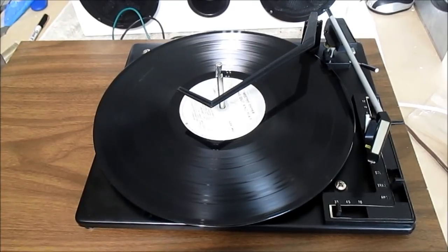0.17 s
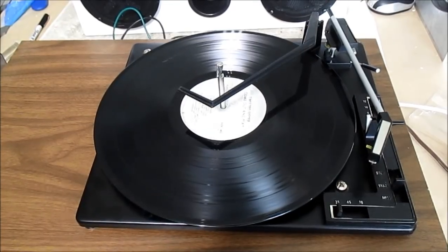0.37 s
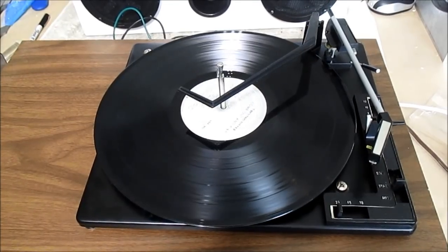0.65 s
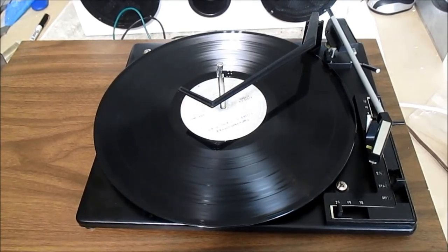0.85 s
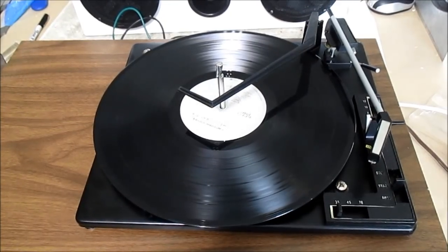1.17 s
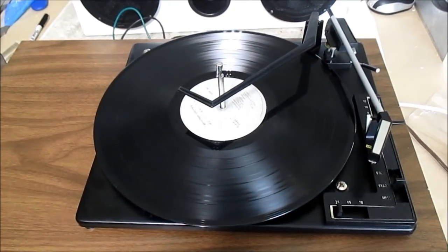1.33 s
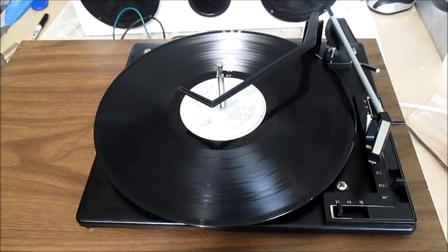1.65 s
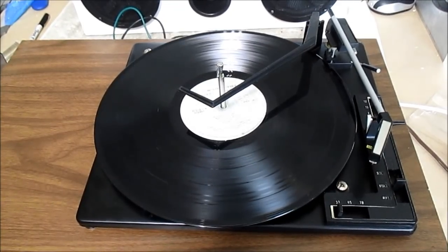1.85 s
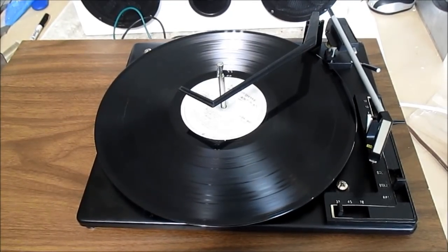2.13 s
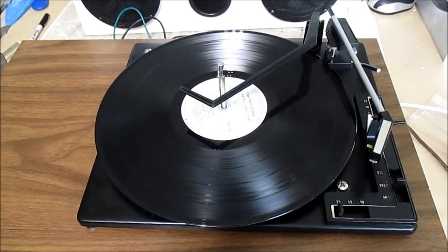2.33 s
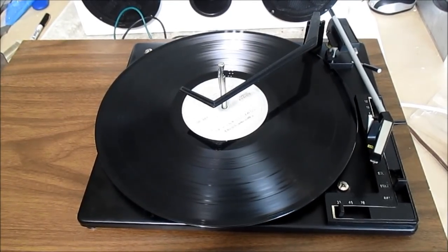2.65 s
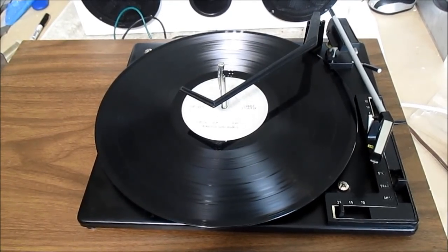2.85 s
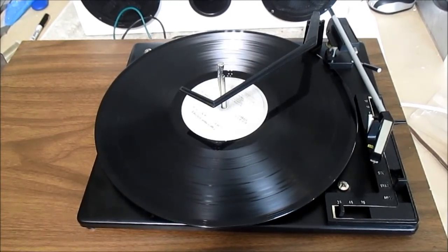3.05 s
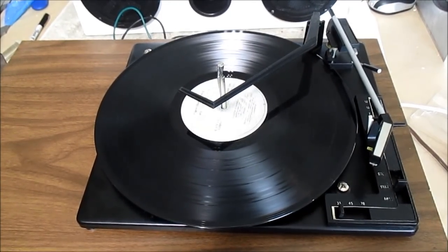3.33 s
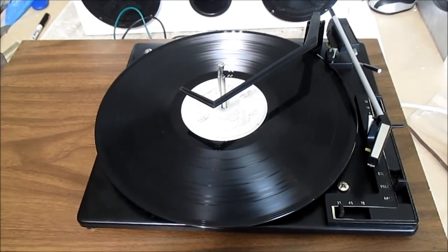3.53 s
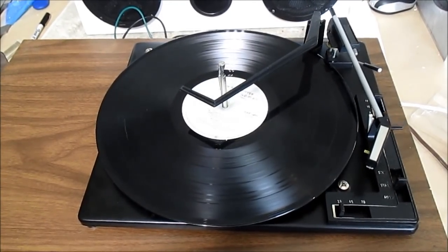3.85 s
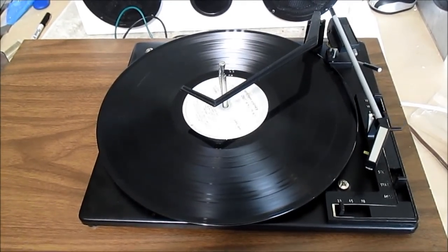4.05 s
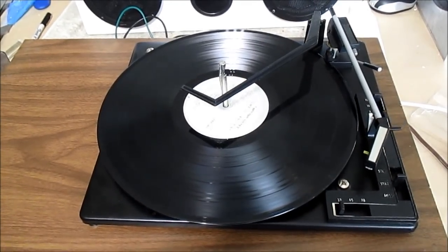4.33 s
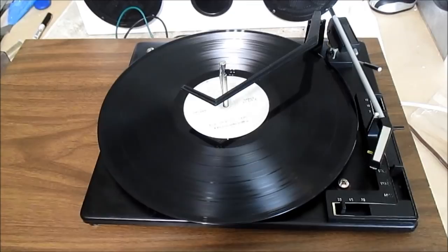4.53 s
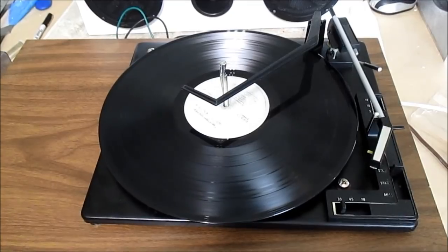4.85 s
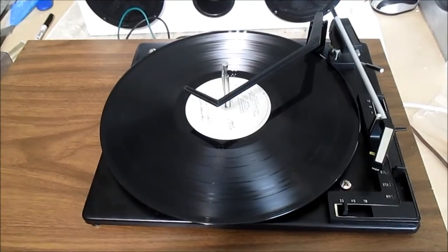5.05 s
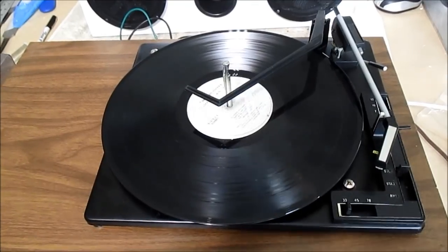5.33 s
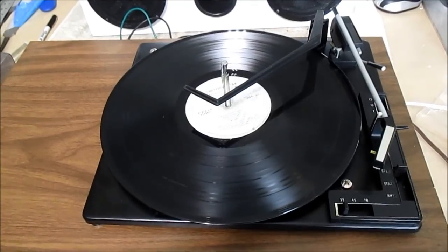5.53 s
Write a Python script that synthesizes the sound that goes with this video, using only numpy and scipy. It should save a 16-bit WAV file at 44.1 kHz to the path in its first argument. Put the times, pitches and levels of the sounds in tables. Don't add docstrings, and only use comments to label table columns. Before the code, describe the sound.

A small turntable motor hums and rumbles while levers tick and knock irregularly, ending in a loud hard clunk, then quieter hum.

```python
import sys
import numpy as np
from scipy import signal
from scipy.fft import rfft, irfft, next_fast_len
from scipy.io import wavfile
from scipy.ndimage import map_coordinates

SR = 44100
rng = np.random.default_rng(int(sys.argv[2]) if len(sys.argv) > 2 else 0)


def dump(signal):
    limited = np.clip(np.atleast_2d(signal).T, -1, 1)
    pcm = np.round(limited * 32767).astype(np.int16)
    wavfile.write(sys.argv[1], SR, pcm)


def invert_db(x):
    u = np.asarray(x, float) / 20
    return 10 ** u


N = 250532
T = np.arange(N) / SR

# [f/Hz, level/dB, t60/s]
PLINTH_MODES = [(136, 3, 0.55), (180, -7.5, 0.72), (223, 3, 0.3), (228.7, 3.5, 0.36), (258, -1.5, .27),
                (336, 0, 0.33), (379.7, 3.5, 0.27), (344, -2, .35), (395, -1, 0.22), (453, -7, 0.31),
                (489, -10, 0.66), (531, -14, 0.17)]


def unit(x):
    return x / np.sqrt(np.mean(x ** 2) + 1e-20)


def along(points, hz):
    f, v = np.transpose(points)
    return np.interp(np.log(hz + 1), np.log(f + 1), v)


def wobble(rate_hz):
    knots = rng.standard_normal(int(N * rate_hz / SR) + 4)
    return map_coordinates(knots, [T * rate_hz])


def noise(gain):
    m = next_fast_len(N + 8192)
    spectrum = rfft(rng.standard_normal(m)) * gain(np.fft.rfftfreq(m, 1 / SR))
    return unit(irfft(spectrum, m)[:N])


def smooth_step(at_s, takes_s):
    return .5 + .5 * np.tanh((T - at_s) / takes_s)


def ring(modes, centre_hz, octaves, t, luck):
    hz, db, t60 = np.transpose(modes)[:, :, None]
    near = np.exp(-.5 * (np.log2(hz / centre_hz) / octaves) ** 2)
    decay = invert_db(db + 1.5 * luck[:, None] - 60 * t / t60)
    x = np.sum(near * decay * np.sin(2 * np.pi * hz * t), axis=0)
    return x / np.abs(x).max()


def add(track, at_s, x):
    track[round(at_s * SR):][:len(x)] += x


def contacts():
    # [t/s, peak/dB, centre f/Hz, spread/octaves, t60/s]
    clunk_clicks = [
        (4.4230, -24, 2000, .8, .03),
        (4.4264, 5, 1650, .7, .015),
        (4.4268, -3, 1000, .25, .016),
        (4.4346, -19, 2200, 1.0, .02),
        (4.4385, -17, 1500, 1.0, .03),
        (4.4418, -8, 3700, .5, .025),
        (4.4452, -14, 2500, 1.0, .02),
        (4.4474, 2, 2000, 1.2, .03),
        (4.4478, 3, 1100, .35, .035),
        (4.474, -28, 4500, .7, .02),
    ]
    # [t/s, peak/dB, centre f/Hz, sparkle/dB, t60/s]
    clacks = [(1.238, -6, 1920, -30.5, .06), (1.2387, -26.5, 4640, -11.5, 0.048),
              (1.908, -28.5, 1150, -36, 0.062), (2.043, -36, 3840, -6.5, 0.024),
              (3.168, -30, 1450, -40, 0.056), (3.354, -14.5, 1880, -45, 0.027),
              (3.44, -30.5, 1220, -26, 0.087), (3.727, -28.5, 2400, -24, 0.071),
              (3.739, -15.5, 1210, -40.5, 0.11), (3.751, -13, 1800, -33, 0.015),
              (3.761, -28, 1570, -33, 0.026), (3.856, -17.5, 1700, -46, 0.058),
              (3.894, -42, 4200, 4, 0.051), (3.965, -35.5, 2900, -33, .033), (4.084, -39, 2700, -25, 0.05),
              (4.181, -24, 1100, -43.5, 0.034), (4.405, -18, 1740, -27.5, 0.065)]
    # [t/s, peak/dB, centre f/Hz]
    pawl_ticks = [(1.173, -49, 1530), (1.626, -49, 1400), (1.842, -54, 1790), (2.912, -42, 1300),
                  (2.927, -42.5, 1700), (3.29, -51, 1390), (3.413, -44, 1600), (3.435, -40.5, 3780),
                  (3.560, -40, 1830), (3.611, -48, 2000), (3.795, -40, 2300), (3.88, -36, 3670),
                  (4.339, -46, 2610), (4.39, -47, 2950), (5.551, -43.5, 2780), (5.575, -45.5, 990),
                  (5.62, -49, 1290), (5.649, -44, 1080)]
    rows = list(clacks)
    for s, db, hz in pawl_ticks:
        sparkle_db = -34.5 + 25 * (hz / 4200) ** 2
        t60_s = 0.12 * 1700 / hz
        rows.append((s, db, hz, sparkle_db, t60_s))
    cycle = [(s, db, hz, 0.79 + .006 * db, *rest) for s, db, hz, *rest in rows]
    return cycle + [(s, db, hz, octaves, -12.5, t60) for s, db, hz, octaves, t60 in clunk_clicks]


def clicks():
    # [f/Hz, level/dB, t60/s]
    steel_modes = [(885, -7.5, 0.1), (1017, -5, 0.24), (1290, -4, 0.81), (1400, 3.5, 0.15),
                   (1625, 6.5, 0.22), (1776, 0, 0.1), (2150, -8.5, 0.12), (2515, 4, 0.06),
                   (2780, 2.5, 0.054), (3190, -3, 0.04), (3800, -7.5, 0.033), (4220, -4.5, 0.12),
                   (4740, 3, 0.12), (5053, -0.5, .06)]
    out, t = np.zeros(N + SR), np.arange(SR // 3) / SR
    high = signal.butter(2, [3700, 10000], "band", fs=SR, output="sos")
    for s, db, hz, octaves, sparkle_db, t60_s in contacts():
        luck = rng.standard_normal(len(steel_modes))
        grit, sparks = rng.standard_normal((2, len(t)))
        fade = invert_db(-60 * t / max(t60_s, .008))
        steel = ring(steel_modes, hz, octaves, t, luck) * (fade + invert_db(-23.5))
        edges_hz = [hz / 2 ** (.7 * octaves), hz * 2 ** octaves]
        band = signal.butter(3, edges_hz, "band", fs=SR, output="sos")
        chatter = invert_db(-25 - 60 * t / .25)
        scrape = invert_db(-13) * unit(signal.sosfilt(band, grit)) * (fade + chatter)
        crack = invert_db(sparkle_db - 60 * t / min(t60_s, .03)) * signal.sosfilt(high, sparks)
        rise = 1 - np.exp(-(t / 0.0007) ** 2)
        add(out, s, invert_db(db) * (steel + scrape + crack) * rise)
    return out[:N]


def knocks():
    # [t/s, peak/dB, f/Hz, swing length/s]
    cycle_knocks = [(.079, -53.5, 335, 0.039), (.714, -56.5, 395, 0.11), (1.079, -48.5, 360, 0.028),
                    (1.2405, -21, 340, 0.026), (1.628, -39, 307, 0.012), (1.907, -47, 236, 0.072),
                    (1.909, -39.5, 421, 0.02), (2.046, -33.5, 247, 0.018), (2.048, -38, 379, 0.037),
                    (3.746, -32, 504, 0.021), (2.899, -55, 360.6, 0.11), (2.931, -36, 380, 0.026),
                    (2.991, -49, 290, 0.046), (3.169, -43, 426, 0.016), (3.266, -46.5, 250, 0.014),
                    (3.338, -43.5, 243, 0.042), (3.446, -36.5, 268, 0.017), (3.531, -51, 443, 0.1),
                    (3.572, -38.5, 372, 0.036), (3.782, -37, 401, 0.043), (4.239, -42.5, 340, 0.035),
                    (3.7411, -21, 351.7, 0.017), (3.863, -46.5, 364, 0.052), (4.183, -25.5, 334, 0.024),
                    (4.409, -26.5, 310, .02), (5.509, -54.5, 242, .029)]
    # [t/s, peak/dB, f/Hz, swing length/s, rise/s]
    clunk_knocks = [
        (4.4272, -8, 380, .005, .0004),
        (4.4378, -17, 250, .013, .001),
        (4.4484, 5, 280, .016, .0002),
        (4.452, -10, 146, .03, .004),
        (4.449, -22, 75, .05, .004),
        (4.4585, -16, 335, .09, .004),
        (4.47, -23, 140, .25, .02),
    ]
    out, t = np.zeros(N + SR), np.arange(SR // 2) / SR
    default_rise_s = 0.00089
    rows = [(*row, default_rise_s) for row in cycle_knocks] + list(clunk_knocks)
    for s, db, hz, length_s, rise_s in rows:
        luck = rng.standard_normal(len(PLINTH_MODES))
        swing = invert_db(-60 * (t / length_s / 1.1) ** 2.6) * np.sin(2 * np.pi * hz * t)
        body = invert_db(-13) * ring(PLINTH_MODES, hz, .6, t, luck)
        rise = 1 - np.exp(-t / max(rise_s, .0002))
        add(out, s, -invert_db(db + 6.0) * (swing + body) * rise)
    return signal.sosfilt(signal.butter(2, 100, "high", fs=SR, output="sos"), out[:N])


def room(x):
    # [f/Hz, t60/s]
    decay_t60 = [(150, 0.34), (500, 0.5), (1500, 0.36), (3500, 0.33), (6000, 0.36), (12000, 0.2)]
    hz, t, z = signal.stft(rng.standard_normal(SR // 2), SR, nperseg=256)
    decay = invert_db(-60 * t / along(decay_t60, hz)[:, None])
    dulling = 1 + (hz[:, None] / 7000) ** 2
    tail = signal.istft(z * decay / dulling, SR, nperseg=256)[1]
    delayed = np.pad(x, (330, 0))
    return signal.fftconvolve(delayed, tail / np.linalg.norm(tail))[:N]


def motor():
    # [t/s, load/dB]
    load_points = [(0, -10.5), (.35, -3), (1.1, -3.5), (1.5, -3), (1.94, 3), (2.2, -0.5), (2.7, -4),
                   (2.9, 0), (3.5, 2.5), (3.8, 10.5), (4.2, -3.5), (4.35, 9)]
    # [t/s, peak/dB]
    chirps = [(0.2382, -41), (0.2901, -43), (0.327, -35.5), (0.4118, -44), (0.4433, -39), (0.4957, -54),
              (0.5445, -41), (0.6144, -38), (0.6603, -39), (0.7147, -41), (0.7611, -42), (0.8693, -39),
              (0.9766, -37.5), (1.0464, -45)]
    # [f/Hz, width/Hz, level/dB]
    bearing = [(1700, 750, -7), (2084, 44, 5), (2500, 120, -2.5), (2810, 38, -2)]
    # [f/Hz, level/dB per Hz]
    gear_spectrum = [(500, -12.5), (900, 10), (1500, 4), (2500, -10.5), (5000, -14.5), (9000, -45)]
    stop_s, rotor_hz = 4.45, 58.96
    load_db = np.interp(T, *np.transpose(load_points))
    spin = invert_db(-60 * np.maximum(T - stop_s, 0) / 0.37)

    def box(f):
        return np.sqrt(sum(invert_db(db - 0.02 * (400 - c)) ** 2 / (1 + ((f - c) / 9) ** 2) ** 2
                           for c, db, _ in PLINTH_MODES))

    def bearing_gain(f):
        return np.sqrt(sum(invert_db(2 * db) / (1 + (2 * (f - c) / w) ** 2) for c, w, db in bearing))

    drone = invert_db(-57 + load_db + 4 + 0.99 * wobble(7.3)) * noise(box)

    gear_db = -70 + 0.6 * load_db + 6 * smooth_step(1.1, .15)
    gears = invert_db(gear_db + 1 + 2.8 * wobble(45)) * noise(lambda f: invert_db(along(gear_spectrum, f)))

    fits = sum(invert_db(db - 20.5) * np.exp(-.5 * ((T - s - .012) / 0.0078) ** 2) for s, db in chirps)
    rub = fits * noise(bearing_gain)

    throb_db = -50 - 12 * (1 - smooth_step(0.28, 0.048))
    throb_db -= 4.5 * smooth_step(1.9, .07)
    throb_db -= 14 * np.exp(-((T - 2.58) / .08) ** 2)
    phase = 2 * np.pi * rotor_hz * T + 0.69 * wobble(3.7)
    throb = invert_db(throb_db + 2 + 2.0 * wobble(10)) * np.sin(phase)
    return spin * (drone + gears + rub) + throb * (spin + .15)


def hum():
    # [multiple of mains f, level/dB]
    overtones = [(2, -53), (3, -59), (4, -57.5)]
    # [f/Hz, level/dB per Hz]
    air_spectrum = [(8, -26.5), (15, -7), (40, -3), (85, -9.5), (105, -2.5), (145, -11.5), (210, -13.5),
                    (420, -29.5)]
    # [f/Hz, level/dB per Hz]
    hiss_spectrum = [(100, -31), (300, -16.5), (600, -23.5), (1500, -27.5), (3150, -34), (6000, -40),
                     (10000, -46), (16000, -59)]
    mains_hz, air_top_hz = 59.98, air_spectrum[-1][0]
    lines = sum(invert_db(db + 2 + 0.84 * wobble(1.3)) * np.sin(2 * np.pi * k * mains_hz * T + k)
                for k, db in overtones)
    air = noise(lambda f: invert_db(along(air_spectrum, f)) * (f < air_top_hz))
    hiss = noise(lambda f: invert_db(along(hiss_spectrum, f)))
    return lines + invert_db(-50.5 + 0.26 * wobble(0.7)) * air + invert_db(-57.0) * hiss


def whine():
    field_hz, high_hz, low_hz = 59.94, 11793, 3941
    since_s = ((T - .0032) * field_hz + .5) % 1 / field_hz - .5 / field_hz
    size = 1 - .65 * (np.abs(since_s) < .0027) + 1.5 * np.exp(-.5 * (since_s / .0004) ** 2)
    saw = 1.2 * ((T - .0047) * field_hz / 2 % 1 - .5)
    high = invert_db(-70) * size * np.sin(2 * np.pi * high_hz * T + saw)
    low = invert_db(-69) * np.sin(2 * np.pi * low_hz * T + .6 * np.sin(np.pi * field_hz * T))
    return high + low


def scene():
    steel, wood = clicks(), knocks()
    answer = room(invert_db(-19.5) * steel + invert_db(-14) * wood)
    return (steel + wood + answer + motor() + hum())[None]


def low_pass(x):
    return signal.sosfilt(signal.butter(12, 16480, fs=SR, output="sos"), x)


def record(dry):
    duck_s, hold_s, top_hz = 4.43, 0.42, 16450
    since_s = np.maximum(T - duck_s, 0)
    down_db = 13.5 * np.minimum(since_s / 0.027, 1) + 9.5 * np.minimum(since_s, hold_s)
    back_db = 9 * (1 - np.exp(-np.maximum(since_s - hold_s, 0) / 0.32))
    x = (dry + whine()) * invert_db(0.99 - down_db + back_db)
    x = x / (1 + np.abs(x) ** 12) ** (1 / 12)
    x = irfft(rfft(x) * (np.fft.rfftfreq(N, 1 / SR) < top_hz), N)
    return low_pass(x)


dry = scene()
out = record(dry)
dump(out)
```